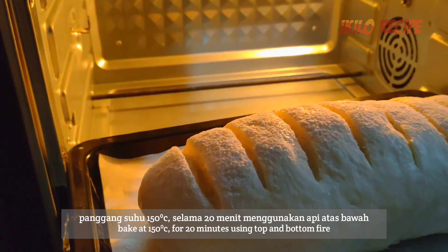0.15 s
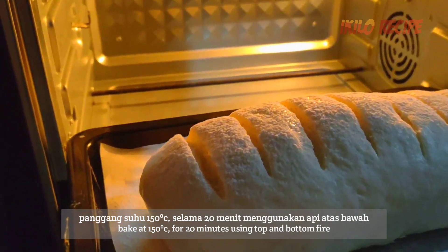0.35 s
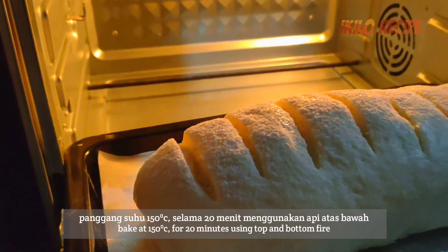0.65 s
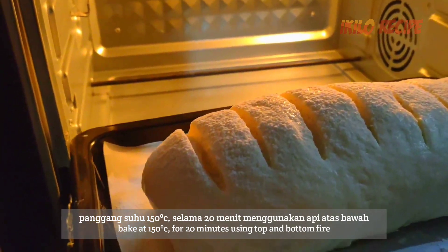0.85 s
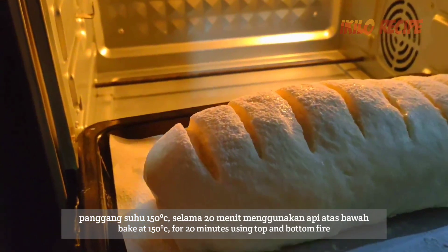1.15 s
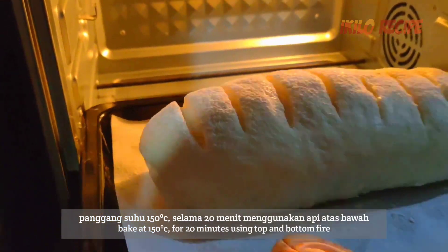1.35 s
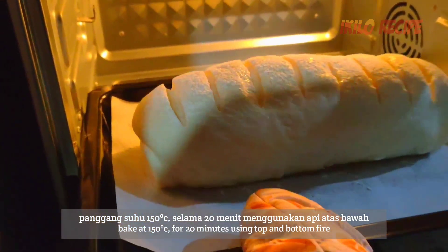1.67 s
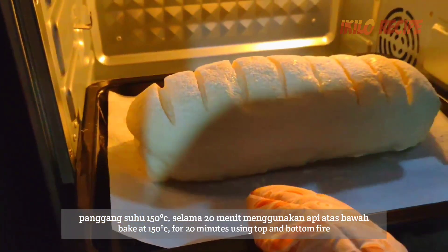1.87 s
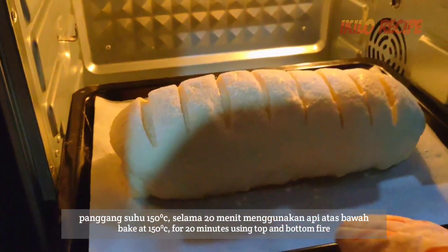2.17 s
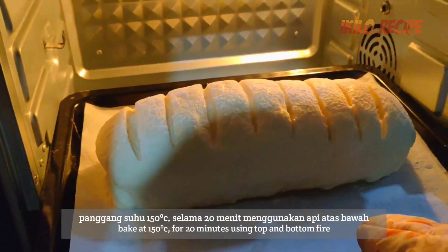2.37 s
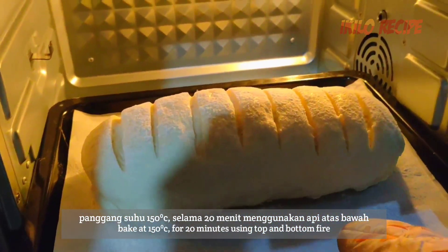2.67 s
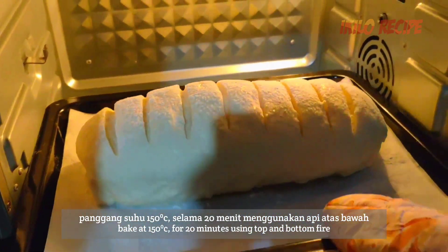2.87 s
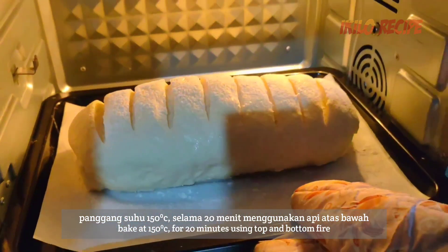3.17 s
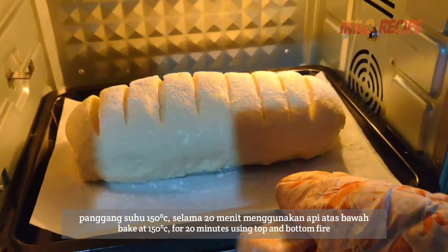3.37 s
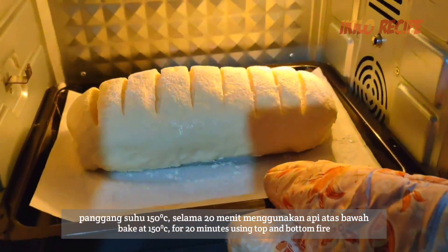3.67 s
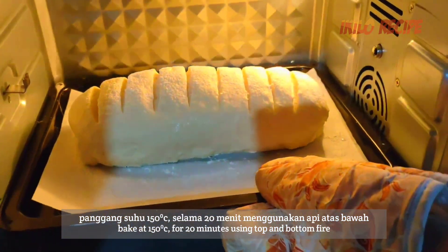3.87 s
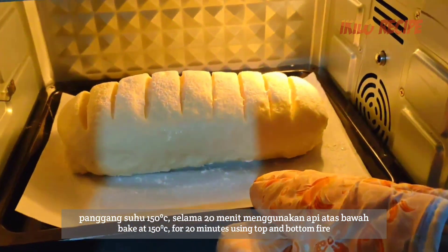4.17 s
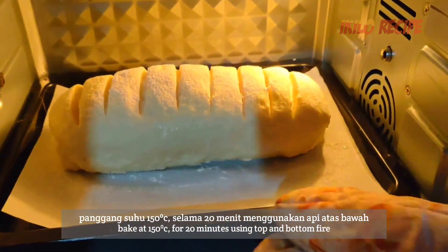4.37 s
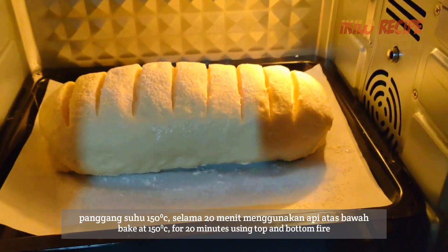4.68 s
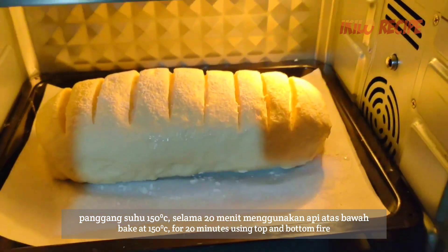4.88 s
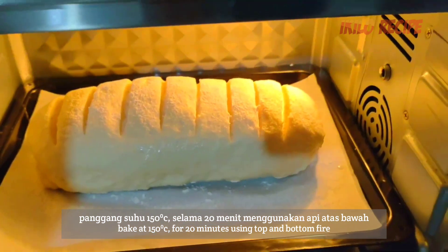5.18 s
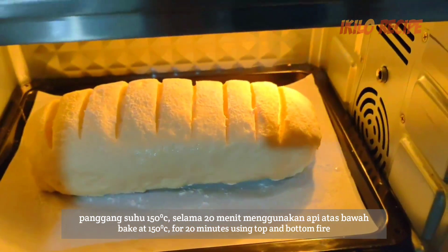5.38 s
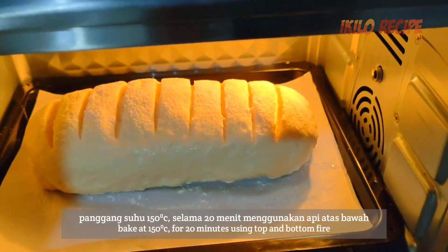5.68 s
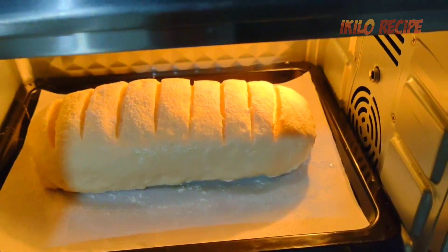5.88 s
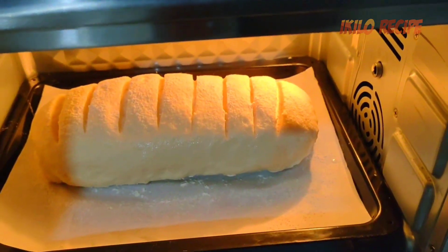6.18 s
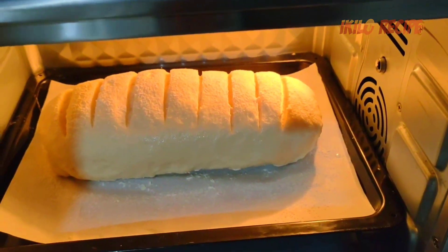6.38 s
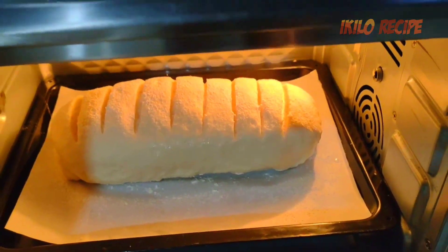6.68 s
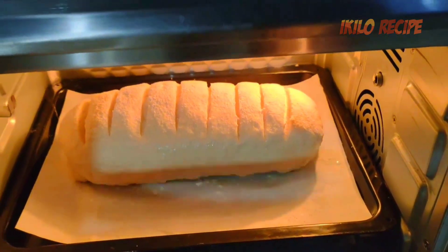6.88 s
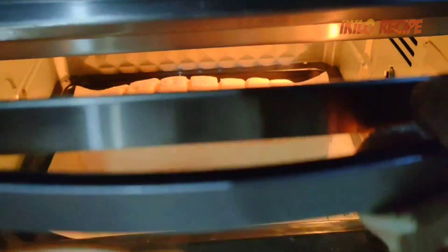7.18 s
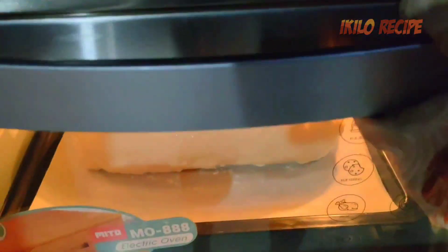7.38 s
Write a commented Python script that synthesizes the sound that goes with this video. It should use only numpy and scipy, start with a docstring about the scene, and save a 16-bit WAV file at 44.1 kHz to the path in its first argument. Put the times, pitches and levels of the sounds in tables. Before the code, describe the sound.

A small oven in a quiet home kitchen, close stereo microphone, faint room noise. A clockwork timer ticks crisply and slightly unevenly about four times a second throughout. From 0 to 0.9 s a metal tray rubs softly, with a light bump on the rack at 0.1. A push from 1.0 grows into a rough scrape, with a bump at 1.2, loud knocks at 1.5-1.65 and rattling, grating metal until about 2.1. Small dull bumps follow at 2.3-2.4. From 2.7 a longer scrape runs with knocks near 3.05 and 3.5, ending at 4.07 in a loud bang against the back, its low panel boom sinking in pitch as it dies. From 4.5 to 6.3 only ticks, soft hand rustles and faint scuffs. From 6.4 hinges rub, creak and jolt lightly; at 7.53 the door shuts with a hard, short metallic slam.

```python
"""A small oven in a quiet kitchen, heard up close by a stereo microphone.
A metal baking tray is set on the wire rack and scraped in until it bangs against the back; the glass door
then swings up on its hinges and shuts, while the oven's clockwork timer ticks throughout.
Blows set off dense noise and clear dying modes, rubbing is many tiny slips driving the metal,
the timer is a pair of alternating clicks with rebounds, and the kitchen is faint coloured noise."""
import sys
import numpy as np
from scipy import signal
from scipy.fft import rfft, irfft
from scipy.io import wavfile

SR = 44100
rng = np.random.default_rng(int(sys.argv[2]) if len(sys.argv) > 2 else 0)


def transcribe(signal):
    """Save signal, clipped to [-1, 1], as a 16-bit WAV file at the path in sys.argv[1]."""
    frames = np.atleast_2d(signal).T
    limited = np.clip(frames, -1, 1)
    pcm = np.round(limited * 32767).astype(np.int16)
    wavfile.write(sys.argv[1], SR, pcm)


N = 332514
RING_TIME = np.arange(SR) / SR  # every blow may ring for one second

# The tray nudges the wire rack. Each row: start in seconds, level in dB, bass shelf in dB, treble shelf in dB,
# crack t60 in seconds (longer in the bass), tail in dB below or above the crack, ring in dB re the level,
# boom centre in Hz.
RACK_BUMPS = [(0.135, -40.5, 6.5, 2, 0.15, -12, -5.5, 268), (0.466, -61, -6, -9, 0.044, 6, -9, 403),
              (1.175, -45, -2, -3.5, 0.17, -10, -0.5, 145)]
# The tray knocks on the rails. Each row: the same eight columns as the rack bumps, in the same units.
TRAY_KNOCKS = [(1.526, -24.5, -0.5, -0.5, 0.067, -13, -8, 215),
               (1.556, -34.5, -18, -12.5, 0.06, -23, -12, 200), (1.6538, -28, -4.5, 1, 0.038, -17, -9, 282),
               (1.945, -36, -9, -8.5, 0.041, -17.5, -11.5, 160),
               (3.050, -33.5, -3, -7.5, 0.044, -13.5, -8.5, 352.7),
               (3.077, -38, -10.5, -16, 0.13, -14, -11.5, 340),
               (3.098, -42.5, -6.5, -13.5, 0.14, -12.5, -13, 360),
               (3.493, -47, -19, -8.5, 0.055, -14, 0, 155)]
# The tray bumps dully over the rack's cross wires. Each row: start in seconds, level in dB, bass shelf in dB,
# treble shelf in dB, crack t60 in seconds (longer in the bass), tail in dB re the crack, ring in dB re the level.
WIRE_BUMPS = [(1.993, -42, -2, -7, 0.088, -7, -2), (2.253, -52, -21, -15, 0.097, -16, -16),
              (2.271, -47.5, 2, -2, 0.15, -6, -5), (2.295, -47.5, -9.5, -10, 0.16, -19, -14),
              (2.360, -58.5, 4, -9, 0.087, -9, -11), (2.439, -52.5, -4, 4, 0.12, -18, -17),
              (2.785, -62, 1, -4, 0.087, -18, -14), (2.935, -49.5, 0, 4, .06, -1, -6),
              (3.313, -59, -15, 16, .06, 1, -16), (3.638, -56, -8, 9, 0.071, -7, -20)]
# The tray hits the back of the oven. Each row: the seven columns of the wire bumps, in the same units.
BACK_STOP = [(4.074, -22, -1, 3, 0.18, -11, -3.5), (4.0778, -23.5, -6, -2, 0.029, -20, -22)]
# The door jolts in its hinges. Each row: the seven columns of the wire bumps, in the same units.
HINGE_JOLTS = [(4.975, -69.5, 12, -6, 0.045, -18, 3.5), (6.611, -62, -4, 7, .1, -15, -25.5),
               (6.623, -50, -2, -1.5, 0.14, -10, -28), (6.646, -59.5, 1, -10, 0.071, -10, -12),
               (6.809, -53.5, 5, -12, 0.15, -6, -16), (6.980, -52.5, 5.5, 6, 0.1, -9.5, -17),
               (6.997, -58.5, 1, -15, .07, -2.5, -17), (7.179, -64, 2, -3, .1, -10, -23),
               (7.186, -52.5, -1.5, -7, 0.076, -11, -2), (7.198, -54, 1, -18, 0.06, -14, -2),
               (7.222, -64, 2, -10, .09, -6, 5.5)]
# The door meets its frame. Each row: the seven columns of the wire bumps, in the same units.
DOOR_SHUT = [(7.526, -57.5, 6, -28, 0.12, -4, 4.5), (7.5318, -22, -2.5, -2, 0.065, -3, -33)]

# Clear modes of the wire rack. Each row: frequency in Hz, relative level in dB, t60 in seconds.
RACK_MODES = [(145.6, -0.5, 0.49), (205, -14, .4), (302.4, -5.5, 0.58), (398, -17, .45), (635, -11, 0.4),
              (840, 0, .25), (946, 3, 0.19), (990, -3, 0.12), (1590, -16, 0.3)]
# Clear modes of the tray. Each row: frequency in Hz, relative level in dB, t60 in seconds.
TRAY_MODES = [(152.6, -3.5, 0.66), (187.6, -3.5, 0.25), (246, -2, 0.08), (277, -5, 0.75),
              (349.1, -3.5, 0.3), (406, -8.5, 0.16), (438, -8.5, 0.56), (461, -13, 0.6), (641, -17.5, .6),
              (823, -6.5, 0.64), (856, -10.5, 0.73), (1060, -13, .2), (1910, -11, .15), (2280, -6.5, 0.16),
              (2630, -14, 0.2), (4130, -17, 0.15), (5250, -19, .18), (5670, -1, 0.02), (5940, -6.5, 0.037)]
# Clear modes of the oven's shell. Each row: frequency in Hz, relative level in dB, t60 in seconds.
SHELL_MODES = [(71, -14.5, 0.5), (115.3, -9, 0.45), (183, -3.5, 0.25), (272, -5.5, 0.35), (378, 4, 0.18),
               (375, -8, .55), (390.5, -3.5, 0.85), (505, -7.5, 0.6), (648, -14, 0.55), (690, -14.5, .55),
               (820, -4, 0.35), (1070, -2.5, 0.2), (1205, -2, 0.22), (1570, -18.5, 0.18),
               (1745, -11.5, .25), (1976, -7, 0.2), (2360, -1.5, 0.19), (2450, -8.5, 0.11),
               (2600, -11.5, .22), (3060, -6, 0.15), (4200, -12.5, 0.27), (5000, -15, 0.26),
               (5640, -8, 0.19)]
# Clear modes of the hinges. Each row: frequency in Hz, relative level in dB, t60 in seconds.
HINGE_MODES = [(243, 0, 0.14), (288, 6, 0.15), (383.3, 1, 0.35), (573, 8, 0.06), (633, -5, 0.25),
               (878, -1, 0.12), (1090, -3.5, 0.16), (1490, -12, 0.091), (1790, -12, 0.11)]
# The rails and the tray's rim chattering. Each row: frequency in Hz, relative level in dB, t60 in seconds.
RAIL_MODES = [(1120, -6.5, .03), (1600, -4.5, .02), (1870, -2, 0.025), (2114, 2, 0.039),
              (2570, -2.5, 0.025), (3000, -3.5, .02), (4260, -1, .018), (4600, 1, 0.018),
              (5060, -0.5, 0.018), (5640, -2, 0.018), (5880, -1, 0.02)]
# The escapement's tiny metal parts. Each row: frequency in Hz, relative level in dB, t60 in seconds.
TICK_MODES = [(3900, -2, 0.02), (4540, -1, .03), (5720, 4, 0.02)]
# The thin back panel's boom. Each row: settled frequency in Hz, relative level in dB, t60 in seconds.
PANEL_MODES = [(167.4, -5, 1.3), (170.7, -14, 1.1), (256, -19, 1.6)]
PANEL_DB, PANEL_SAG, PANEL_SAG_S = -26, 0.12, 0.34  # starts sharp by this share and sinks

# The rack's crowd of short-lived resonances. Each row: frequency in Hz, relative level in dB per Hz.
RACK_SPECTRUM = [(30, -35), (100, -30.5), (145, -9.5), (300, -11.5), (500, -14), (750, -17.5), (950, -3),
                 (1200, -21), (3000, -24), (6000, -21.5), (7500, -30), (11000, -41), (15000, -46)]
# The tray's crowd of resonances. Each row: frequency in Hz, relative level in dB per Hz.
TRAY_SPECTRUM = [(30, -38.5), (105, -31), (155, -9), (250, -6.5), (400, -13), (600, -18), (1000, -16.5),
                 (1500, -20.5), (3000, -16), (5800, -11), (7000, -24.5), (8300, -22.5), (11500, -37.5),
                 (15000, -33)]
# The cross wires' crowd of resonances. Each row: frequency in Hz, relative level in dB per Hz.
WIRE_SPECTRUM = [(30, -37), (100, -22), (160, -10), (260, -1), (380, 5), (520, -1.5), (680, -10),
                 (1100, -11.5), (1450, -19.5), (2300, -18), (3500, -21.5), (5800, -23.5), (7200, -30.5),
                 (15000, -42)]
# The oven shell's crowd of resonances. Each row: frequency in Hz, relative level in dB per Hz.
SHELL_SPECTRUM = [(30, -30), (70, -15.5), (120, -13), (200, -9.5), (370, 2), (600, -6.5), (1200, -10),
                  (2200, -10.5), (3650, -18), (4700, -14.5), (5900, -11), (6900, -36), (8000, -22),
                  (9500, -28.5), (12000, -38.5), (15000, -37)]
# The sliding tray's crowd of resonances. Each row: frequency in Hz, relative level in dB per Hz.
SCRAPE_SPECTRUM = [(24, -71), (40, -36), (96, -18.5), (143, -4.5), (179, -4.5), (273, -1), (400, -5.5),
                   (548, -12.5), (838, -9.5), (1520, -15), (2160, -16), (3140, -18), (4400, -18),
                   (5800, -18.5), (7200, -27.5), (8500, -27.5), (11500, -34.5), (15500, -30.5)]
# The hinges' crowd of resonances. Each row: frequency in Hz, relative level in dB per Hz.
HINGE_SPECTRUM = [(30, -35), (90, -6), (150, -5.5), (250, 1.5), (450, -10.5), (950, -9.5), (2000, -12.5),
                  (4000, -17.5), (6000, -16), (7200, -23.5), (15000, -33.5)]
# The door's crowd of resonances. Each row: frequency in Hz, relative level in dB per Hz.
DOOR_SPECTRUM = [(30, -44), (90, -17), (140, -7), (250, 13), (380, -21), (950, 4), (1200, -9), (1560, 6),
                 (2100, -7), (3000, 0), (3800, -10), (4400, 1.5), (6400, -5), (9000, -6), (10800, -18),
                 (12500, -27)]
# The timer's crowd of resonances. Each row: frequency in Hz, relative level in dB per Hz.
TIMER_SPECTRUM = [(40, -20.5), (130, 10.5), (400, 1), (1000, -2.5), (3200, -2), (4500, 0.5), (5900, 1.5),
                  (7000, -5.5), (8500, -6), (11000, -15), (15000, -14)]
# The quiet kitchen's colour. Each row: frequency in Hz, relative level in dB per Hz.
KITCHEN_SPECTRUM = [(18, -51), (30, -24), (148, 2), (230, -15.5), (389, -0.5), (455, -14), (1260, -14.5),
                    (1440, -23.5), (1910, -16), (5890, -20), (7080, -26), (8280, -21.5), (11600, -33),
                    (13300, -53.5), (15500, -58)]

# The tray goes in by four pushes, each a short curve. Each row of a curve: time in seconds,
# rasp in dB from its speed, rumble in dB from its weight on the rails.
PUSHES = [
    [(0, -78.5, -54), (0.1, -68, -62.5), (0.3, -64.5, -52.5), (0.44, -71, -58.5), (0.55, -64.5, -58),
     (0.66, -71, -62.5), (0.77, -63, -61), (0.93, -78, -72)],
    [(1.035, -73, -66), (1.08, -57, -65.5), (1.18, -64, -59.5), (1.37, -63.5, -58), (1.5, -51.5, -54.5),
     (1.73, -52, -40.5), (1.87, -42.5, -48), (2.0, -46.5, -46.5), (2.15, -66, -50)],
    [(2.19, -71.5, -52), (2.3, -58, -62), (2.38, -70, -54), (2.48, -61.5, -56), (2.64, -76.5, -61.5)],
    [(2.71, -71.5, -62.5), (2.8, -56.5, -50), (2.94, -53, -47.5), (3.04, -51.5, -48.5),
     (3.16, -52.5, -49.5), (3.33, -53, -53), (3.45, -60.5, -47.5), (3.68, -53.5, -50.5), (3.85, -62.5, -53),
     (3.94, -55, -51.5), (4.07, -51.5, -51)],
]
JUDDER_DB, JUDDER_PER_S = 0.5, 30  # small catches shake the sliding tray
# The sliding contact's shifting resonances: depth in dB, width in Hz, life in seconds.
PATCH_DB, PATCH_HZ, PATCH_S = 4.5, 120, 0.025
# The door swinging up. Each row: time in seconds, relative rasp in dB, relative rumble in dB.
DOOR_SWING = [(6.42, -69.5, -73), (6.5, -63, -64.5), (6.78, -62.5, -60.5), (6.95, -58.5, -60),
              (7.09, -69.5, -57.5), (7.16, -63, -67), (7.3, -67, -60.5), (7.43, -61.5, -57),
              (7.51, -61.5, -56)]
# Soft rustles as the hand leaves the tray and finds the door. Each row: middle in seconds, length in seconds,
# relative rasp in dB, relative rumble in dB.
RUSTLES = [(4.69, 0.39, -68.5, -63), (5.108, 0.14, -64.5, -66), (5.61, 0.38, -76.5, -72.5),
           (6.038, 0.19, -70, -71.5), (6.293, 0.2, -64.5, -70)]
# Brief pitched scuffs and creaks as the tray and the door rub. Each row: start in seconds, length in seconds,
# first frequency in Hz, last frequency in Hz, width in Hz, level in dB.
SCUFFS = [(0.418, 0.45, 850, 936, 200, -67.5), (1.706, .24, 4720, 5250, 1400, -48),
          (1.81, .13, 2047, 2280, 700, -48), (2.871, 0.21, 1154, 1505, 1000, -58),
          (2.94, 0.14, 2000, 2260, 800, -57), (3.608, 0.15, 2036, 2330, 800, -60.5),
          (5.054, 0.13, 645, 634, 91, -69), (5.055, 0.13, 2250, 2540, 700, -70),
          (5.274, 0.57, 656, 619, 70, -75.5), (5.855, 0.6, 1270, 1324, 260, -78),
          (6.777, 0.11, 1790, 1920, 80, -69), (6.829, 0.16, 1650, 1246, 750, -64),
          (6.811, 0.074, 248, 253, 50, -70), (6.882, 0.17, 900, 855, 220, -65),
          (6.892, 0.151, 570, 506, 90, -64), (7.192, 0.063, 251, 235, 60, -63),
          (7.39, 0.087, 4060, 4020, 1400, -62.5)]

FIRST_TICK_S, TICK_PERIOD_S = 0.1014, 0.243745  # the timer's steady beat
# The ticks' level as the microphone moves about. Each row: time in seconds, relative level in dB.
TICK_LEVEL = [(0, -52.5), (1.4, -57), (2.5, -51), (3.5, -49), (4.5, -49.5), (5.9, -52.5), (6.4, -52),
              (7.0, -49)]
# The escapement's beats are uneven and repeat in fours. Each entry: relative level in dB.
TICK_ACCENTS = [-1, 0, -2.5, 0]

# How long the oven cavity rings. Each row: frequency in Hz, t60 in seconds.
CAVITY = [(80, 0.24), (350, 1), (1000, 0.72), (2500, 0.44), (6000, 0.17), (15000, 0.46)]
# Likeness of the left and right microphones. Each row: frequency in Hz, coherence from -1 to 1.
SAME = [(30, 0.93), (70, .94), (150, 1), (300, 0.96), (450, 0.44), (700, 0.17), (1400, -0.13),
        (4000, -0.008), (15000, 0.26)]
# Left microphone minus right. Each row: frequency in Hz, difference in dB.
LEAN = [(100, -0.5), (500, 1), (1400, 1), (2800, -1), (4600, -2), (6300, -6), (8500, 7.5), (13000, -2)]
EDGE_HZ = 15700  # upper band limit


def tray_blows():
    """The tray meets rack, rails, wires and the oven's back, each with its own resonances."""
    return (knocks(RACK_BUMPS, RACK_SPECTRUM, RACK_MODES, boom_db=5, boom_octaves=0.4)
            + knocks(TRAY_KNOCKS, TRAY_SPECTRUM, TRAY_MODES, boom_db=9, boom_octaves=0.4)
            + blows(WIRE_BUMPS, WIRE_SPECTRUM, TRAY_MODES)
            + blows(BACK_STOP, SHELL_SPECTRUM, SHELL_MODES, ripple_db=3.5))


def knocks(rows, spectrum, modes, boom_db, boom_octaves):
    """Where the tray is struck and held decides which of its low resonances boom."""
    out, hz = 0, np.geomspace(30, 15000, num=120)
    for *blow, boom_hz in rows:
        crowd = np.c_[hz, read(spectrum, hz)]
        clear = np.array(modes, float)
        for table in crowd, clear:
            octaves_off = np.log2(table[:, 0] / boom_hz)
            table[:, 1] += boom_db * np.exp(-(octaves_off / boom_octaves) ** 2)
        out = out + blows([blow], crowd, clear)
    return out


def blows(rows, spectrum, modes, ripple_db=3.0):
    """Each blow sets off the clatter and the clear modes of the thing struck."""
    out, attack = np.zeros((2, N)), round(.03 * SR)
    for s, db, bass_db, treble_db, crack_t60, tail_db, ring_db in rows:
        spot = at_spot(clatter(max(crack_t60, .005), tail_db), ripple_db)
        body = colour(spot, spectrum, bass_db, treble_db)
        body = body / body[:, :attack].std()  # level is set by the first 30 ms
        add(out, s, amp(db) * (body + amp(ring_db) * ring(modes)))
    return out


def panel():
    """The back panel's low boom bends down in pitch as the swing dies."""
    out = np.zeros((2, N))
    boom = ring(PANEL_MODES, sag=PANEL_SAG, sag_s=PANEL_SAG_S)
    add(out, BACK_STOP[0][0], amp(PANEL_DB) * boom)
    return out


def tray_slide():
    """Four pushes scrape the tray along its rails, with grating, chatter and a slight judder."""
    pushes = sum(stroke(push) for push in PUSHES)
    levels = rub_levels(pushes, hiss_db=-4.0, hiss_growth=0.9)
    scrape = friction(levels, SCRAPE_SPECTRUM, TRAY_MODES, slips_per_s=380, spread_db=2.5, ring_db=-7.5,
                      tail_db=-10.5, catch_db=7.5, catches_per_s=8.4, ripple_db=7)
    scrape = grating(scrape, PATCH_DB, PATCH_HZ, PATCH_S, steady_hz=400)
    rattle = chatter(pushes, db=-49.5, growth=1.83, slips_per_s=59)
    return (scrape + rattle) * amp(JUDDER_DB * wander(JUDDER_PER_S))


def friction(levels, spectrum, modes, slips_per_s, spread_db, ring_db, tail_db, catch_db, catches_per_s,
             ripple_db, count=4):
    """Tiny slips drive the metal at a few contact points, which catch in turn, each with its own colour."""
    load = np.array([amp(catch_db * wander(catches_per_s)) for _ in range(count)])
    rub = 0
    for share in load / np.linalg.norm(load, axis=0):
        size = amp(spread_db * np.minimum(rng.exponential(1, N), 4)) * rng.choice([-1, 1], N)
        slips = share * size * (rng.random(N) < slips_per_s / SR)
        spot = at_spot(clatter(0.044, tail_db), ripple_db)
        metal = evened(colour(spot, spectrum)) + amp(ring_db) * evened(ring(modes))
        rub = rub + convolve(slips, metal)
    # weight on the contacts gives the rumble, speed the rasp and the hiss
    out = 0
    for band, gain in zip([(50, 550), (550, 3200), (3200, 16000)], levels):
        sos = signal.butter(3, band, "bandpass", fs=SR, output="sos")
        out = out + evened(signal.sosfilt(sos, rub)) * gain
    return out


def grating(x, patch_db, patch_hz, patch_s, steady_hz=700):
    """The contact keeps shifting, so short resonant patches come and go above the steady rumble."""
    hz, _, z = signal.stft(x, SR, nperseg=512, noverlap=384)
    steps = [max(patch_hz / hz[1], 1), max(patch_s * SR / 128, 1)]  # in frequency bins, in frames
    field = rng.standard_normal(z.shape[1:])
    for axis, step in enumerate(steps):
        field = signal.filtfilt([1], [1, -np.exp(-1 / step)], field, axis=axis, padtype="even")
    depth_db = patch_db * hz[:, None] ** 2 / (hz[:, None] ** 2 + steady_hz ** 2)
    z = z * amp(depth_db * np.tanh(field / np.median(abs(field)) / 2))
    return signal.istft(z, SR, nperseg=512, noverlap=384)[1][:, :N]


def chatter(gains, db, growth, slips_per_s, hard_push_db=-45):
    """Under a hard, fast push the rim sticks and slips: coarse ticks, each its own mix of rail modes."""
    force = (np.sqrt(gains.prod(0)) / amp(hard_push_db)) ** growth
    slips = rng.random(N) < slips_per_s / SR
    out = sum(convolve(slips * rng.standard_normal(N), ring([mode])) for mode in RAIL_MODES)
    return amp(db) * force * evened(out)


def stroke(curve, start_s=0.055, stop_s=0.023):
    """Rasp and rumble gains of one continuous movement that starts and stops quickly."""
    t, (s, *levels) = np.arange(N) / SR, np.transpose(curve)
    moving = np.interp(t, [s[0] - start_s, s[0], s[-1], s[-1] + stop_s], [0, 1, 1, 0])
    return moving * amp([np.interp(t, s, db) for db in levels])


def rub_levels(gains, hiss_db, hiss_growth, usual_db=-60):
    """Rumble, rasp and hiss gains: the hiss rises and falls with the rasp."""
    rasp, rumble = gains
    hiss = amp(usual_db + hiss_db) * (rasp / amp(usual_db)) ** hiss_growth
    return rumble, rasp, hiss


def door_blows():
    """The door jolts in its hinges, then strikes its frame and sets the oven's shell ringing."""
    jolts = blows(HINGE_JOLTS, HINGE_SPECTRUM, HINGE_MODES)
    return jolts + blows(DOOR_SHUT, DOOR_SPECTRUM, SHELL_MODES)


def door_swing():
    """The hinges rub as the door swings up; softer touches of the hand share their friction."""
    gains = stroke(DOOR_SWING) + sum(rustle(*row) for row in RUSTLES)
    levels = rub_levels(gains, hiss_db=-3.5, hiss_growth=0.93)
    swing = friction(levels, HINGE_SPECTRUM, HINGE_MODES, slips_per_s=700, spread_db=3.0, ring_db=-8.0,
                     tail_db=-10.5, catch_db=5.0, catches_per_s=8.0, ripple_db=6.0)
    return amp(-3.0) * grating(swing, patch_db=4.5, patch_hz=120, patch_s=0.021)


def rustle(middle, length, rasp_db, rumble_db, ends_db=-12):
    """Rasp and rumble gains of one brief touch that swells and fades."""
    from_middle = (np.arange(N) / SR - middle) / (length / 2)
    return amp([[rasp_db], [rumble_db]]) * amp(ends_db * from_middle ** 2)


def scuffs(grain_db=3.0, grains_per_s=80):
    """Uneven rubbing in one gliding resonance that swells and fades."""
    out = np.zeros((2, N))
    for s, length, first_hz, last_hz, width_hz, db in SCUFFS:
        size = round(length * SR)
        turns = np.cumsum(np.linspace(first_hz, last_hz, size)) / SR
        noise = rng.standard_normal((2, size)) + 1j * rng.standard_normal((2, size))
        slips = noise * amp(grain_db * wander(grains_per_s, size))
        narrow = signal.sosfilt(signal.butter(2, width_hz / 2, fs=SR, output="sos"), slips)
        gliding = (narrow * np.exp(2j * np.pi * turns)).real
        add(out, s, amp(db) * evened(gliding) * signal.windows.tukey(size, .5))
    return out


def timer(db, rebound_s, rebound_db, uneven_db=-0.5, ripple_db=4, ping_db=15):
    """The escapement clicks about four times a second and rebounds at once; no two teeth sound quite alike."""
    pallets = [colour(clatter(crack_t60=0.089, tail_db=-5.5), TIMER_SPECTRUM) for _ in range(2)]
    out = np.zeros((2, N))
    for k, s in enumerate(np.arange(FIRST_TICK_S, N / SR, TICK_PERIOD_S)):
        level = db + np.interp(s, *np.transpose(TICK_LEVEL)) + TICK_ACCENTS[k % len(TICK_ACCENTS)]
        level = level + uneven_db * rng.standard_normal()
        body = evened(at_spot(pallets[k % 2], ripple_db))
        click = amp(level) * (body + amp(ping_db) * ring(TICK_MODES))
        add(out, s, click)
        rebound_at = s + rebound_s * np.exp(0.27 * rng.standard_normal())
        add(out, rebound_at, amp(rebound_db) * click)
    return out


def kitchen(db):
    """Faint steady room noise."""
    hz, z = noise_pair(N)
    return amp(db) * evened(irfft(z * amp(read(KITCHEN_SPECTRUM, hz)), N))


def clatter(crack_t60, tail_db, rise_cycles=0.11, rise_s=0.00016, slow_hz=250, room_db=-15, room_t60=1.0):
    """Countless sheet-metal resonances: a quick crack, the cavity's tail, the faint room; the bass is slower."""
    t, centres = RING_TIME, np.geomspace(80, 15000, num=7)
    hz, z = noise_pair(SR)
    room = amp(tail_db + room_db - 60 * t / room_t60)
    out = 0
    for centre, share in zip(centres, np.eye(len(centres))):
        band = irfft(z * read(np.c_[centres, share], hz), SR)
        crack = amp(-60 * t / (crack_t60 * (1 + slow_hz / centre)))
        cavity = amp(tail_db - 60 * t / read(CAVITY, centre))
        rise = 1 - np.exp(-t / (rise_s + rise_cycles / centre))
        out = out + band * rise * np.sqrt(crack ** 2 + cavity ** 2 + room ** 2)
    return out


def ring(modes, rise_cycles=0.4, sag=0, sag_s=1):
    """Dying tones that build within a cycle and may sink in pitch; high ones reach the ears out of step."""
    hz, db, t60 = np.transpose(modes)[:, :, None]
    offset = rng.choice([-.5, .5], hz.shape) * np.arccos(np.clip(read(SAME, hz), -1, 1))
    cycles = hz * (RING_TIME + sag * sag_s * (1 - np.exp(-RING_TIME / sag_s)))
    rise = 1 - np.exp(-cycles / rise_cycles)
    fade = rng.choice([-1, 1], hz.shape) * amp(db - 60 * RING_TIME / t60) * rise
    return np.array([(fade * np.sin(2 * np.pi * cycles + side * offset)).sum(0) for side in (-1, 1)])


def at_spot(x, ripple_db):
    """Each point of contact favours its own narrow resonances."""
    hz = np.arange(500, 16000, 110)
    ripple = np.r_[0, rng.uniform(-1, 1, len(hz) - 1)]
    return colour(x, np.c_[hz, ripple_db * ripple])


def colour(x, spectrum, bass_db=0, treble_db=0, bass_hz=480, treble_hz=3200):
    """Causal (minimum-phase) filter with the given spectrum and two shelves."""
    hz = np.fft.rfftfreq(4096, 1 / SR)
    bass = bass_db / (1 + (hz / bass_hz) ** 4)
    treble = treble_db * hz ** 2 / (hz ** 2 + treble_hz ** 2)
    db = read(spectrum, hz) + bass + treble
    log_gain = np.log(amp(np.r_[db, db[-2:0:-1]]))
    return convolve(x, np.fft.ifft(np.exp(np.conj(signal.hilbert(log_gain)))).real)


def noise_pair(size):
    """Frequencies and random spectra for two ears: alike in the bass, nearly unrelated in the treble."""
    hz = np.fft.rfftfreq(size, 1 / SR)
    a, b = rfft(rng.standard_normal((2, size)))
    same = np.clip(read(SAME, hz), -1, 1)
    return hz, np.array([a, same * a + np.sqrt(1 - same ** 2) * b])


def wander(per_s, size=N):
    """A slow random curve of rms 1."""
    hz = np.fft.rfftfreq(size, 1 / SR)
    return evened(irfft(rfft(rng.standard_normal(size)) / (1 + (hz / per_s) ** 4), size))


def amp(db):
    """Decibels to gain."""
    return 10 ** (np.asarray(db) / 20)


def evened(x):
    """Scales to rms 1."""
    return x / np.sqrt(np.mean(x ** 2) + 1e-20)


def read(points, hz):
    """Reads a table along a log-frequency axis."""
    f, value = np.transpose(points)
    return np.interp(np.log(hz + 1), np.log(f + 1), value)


def add(mix, s, sound):
    """Mixes a stereo sound in at time s."""
    part = mix[:, max(round(s * SR), 0):][:, :sound.shape[1]]
    part += sound[:, :part.shape[1]]


def convolve(x, response):
    """Passes x through a response, keeping its length."""
    return signal.fftconvolve(np.atleast_2d(x), np.atleast_2d(response), axes=1)[:, :x.shape[-1]]


def scene():
    """Tray, door and timer close by, over the quiet of the kitchen."""
    tray = tray_blows() + panel() + tray_slide()
    door = door_blows() + door_swing()
    ticking = timer(db=-23.0, rebound_s=0.001, rebound_db=-10.0)
    return tray + door + scuffs() + ticking + kitchen(db=-71.0)


def record(dry, low_cut_hz=45):
    """The two microphones differ a little in colour; the deepest bass is cut away; then the band limit."""
    hz = np.fft.rfftfreq(2 * N, 1 / SR)
    lean = amp(np.outer([.5, -.5], read(LEAN, hz)))
    heard = irfft(rfft(dry, 2 * N) * lean)[:, :N]
    heard = signal.sosfilt(signal.butter(2, low_cut_hz, "highpass", fs=SR, output="sos"), heard)
    band_limit = signal.firwin(401, EDGE_HZ, window=("kaiser", 8), fs=SR)
    return signal.oaconvolve(heard, band_limit[None], "same")


dry = scene()
out = record(dry)
transcribe(out)
```